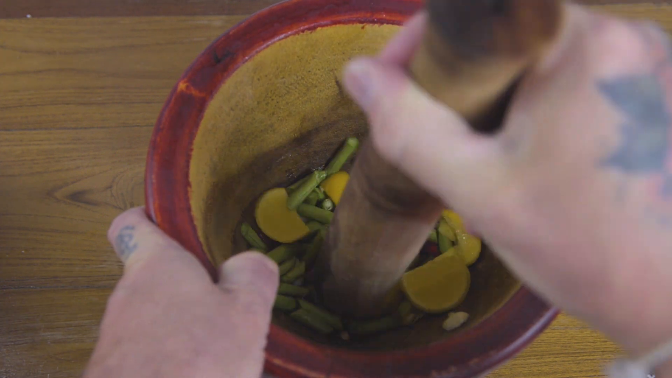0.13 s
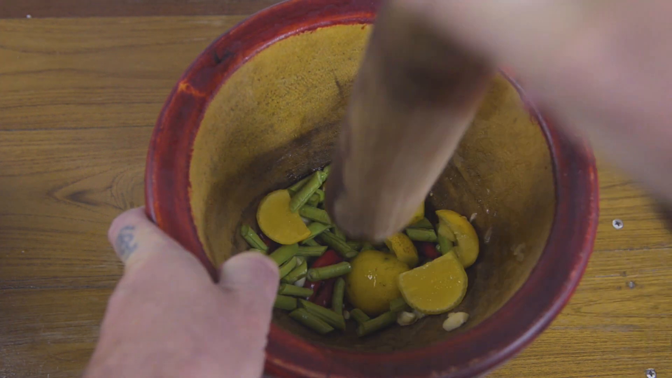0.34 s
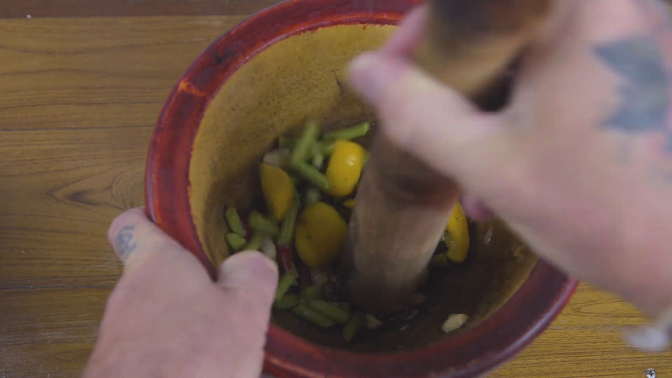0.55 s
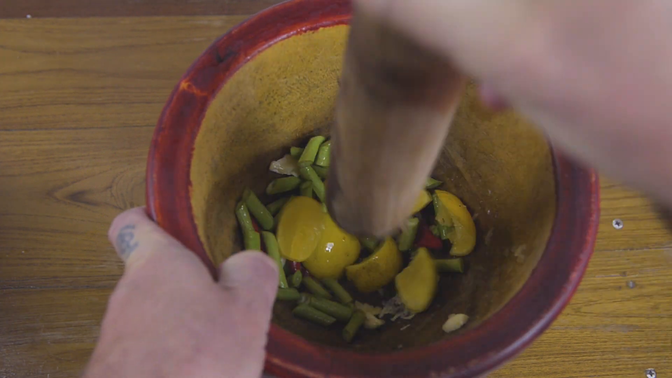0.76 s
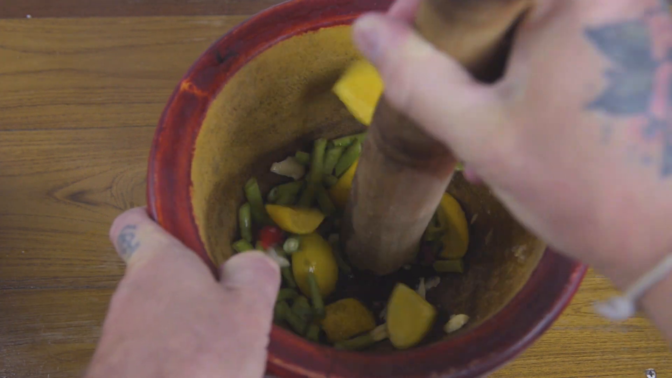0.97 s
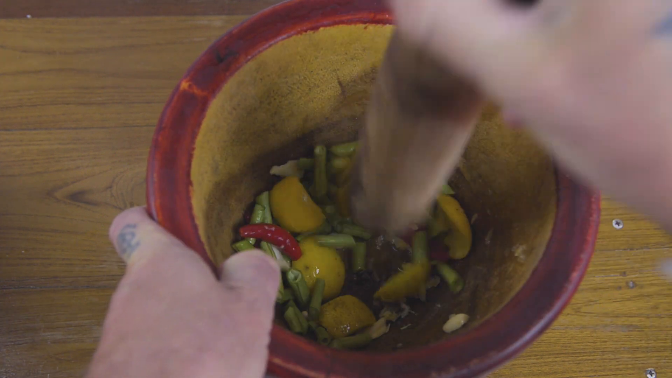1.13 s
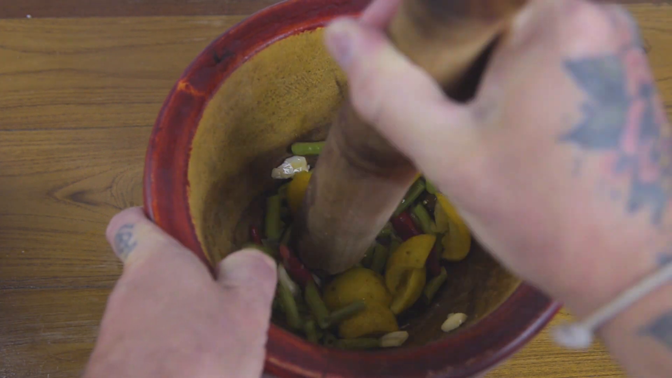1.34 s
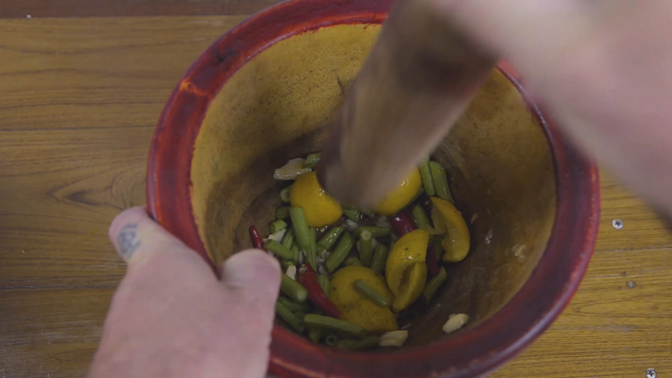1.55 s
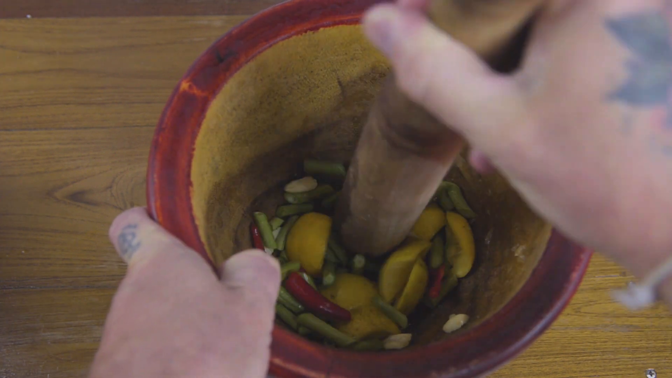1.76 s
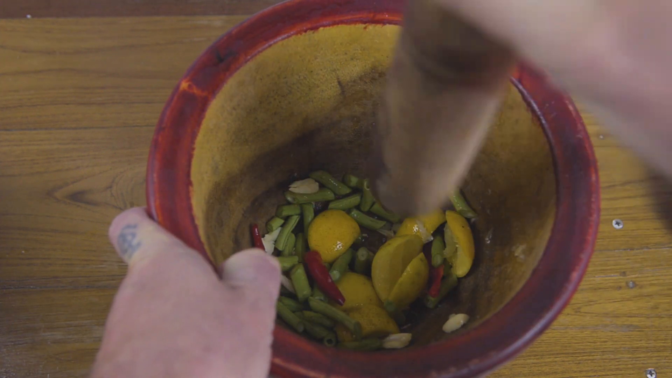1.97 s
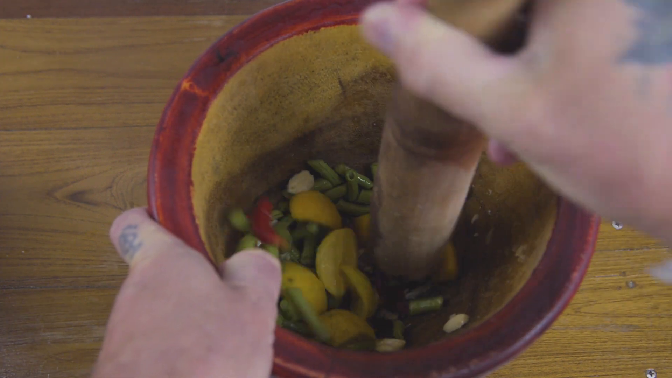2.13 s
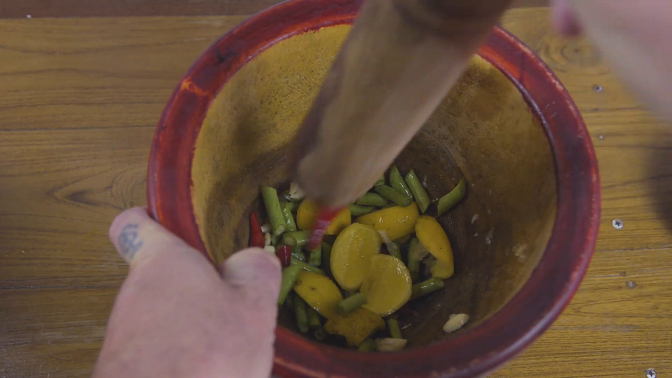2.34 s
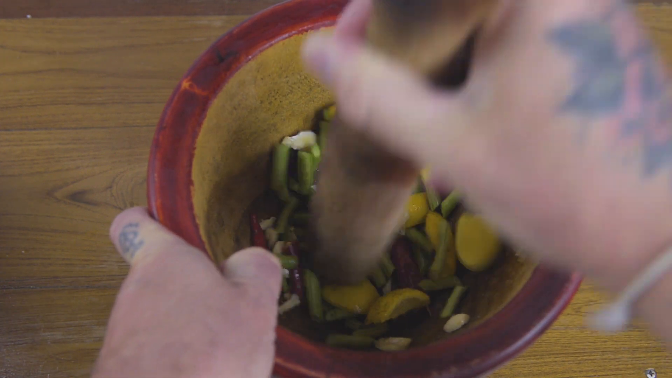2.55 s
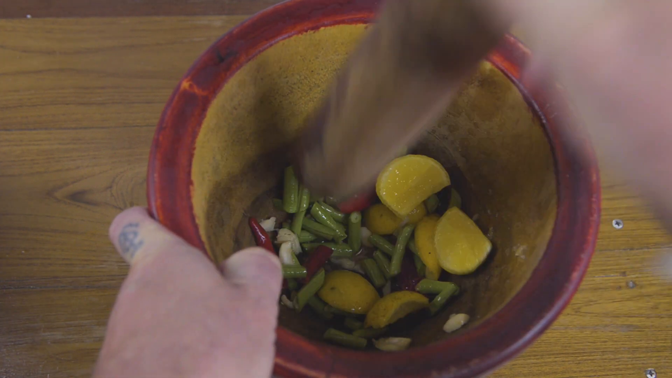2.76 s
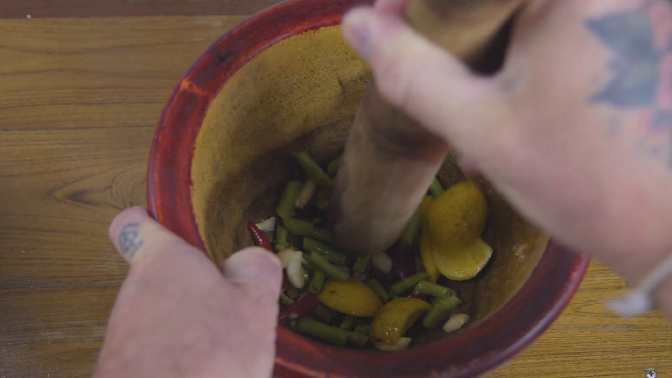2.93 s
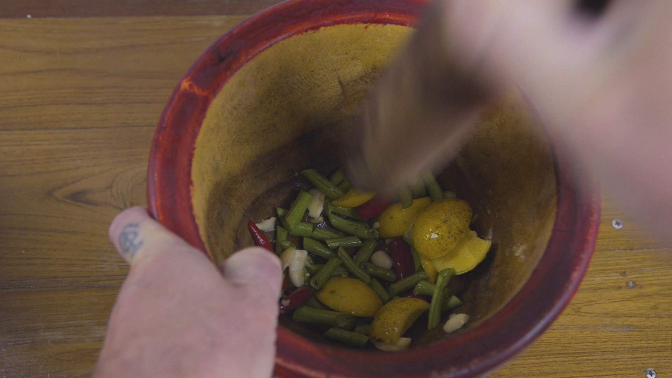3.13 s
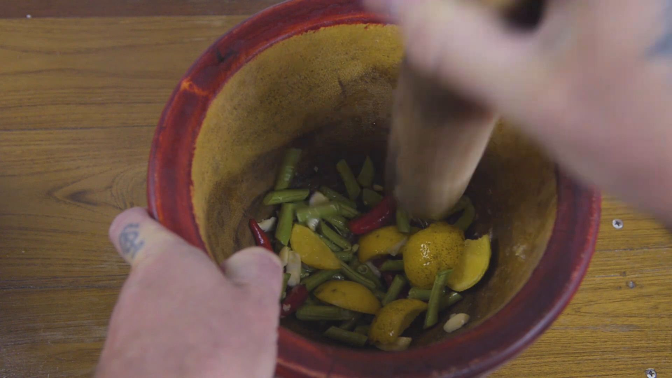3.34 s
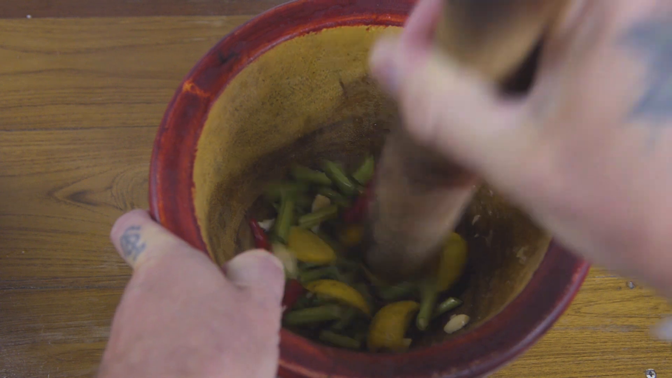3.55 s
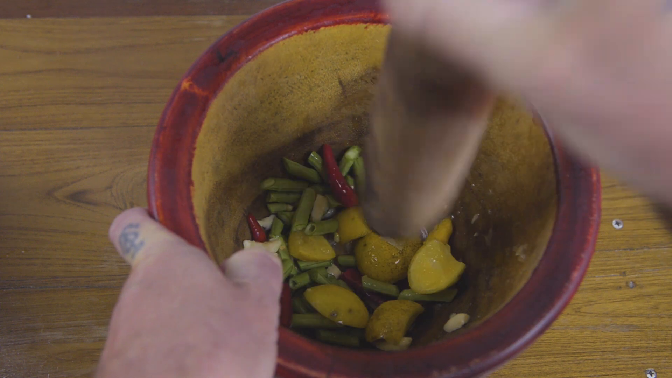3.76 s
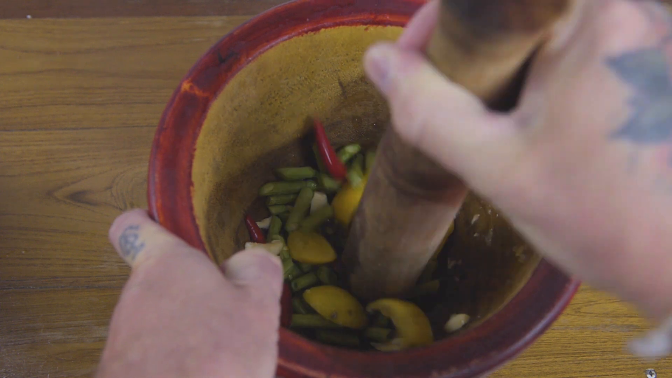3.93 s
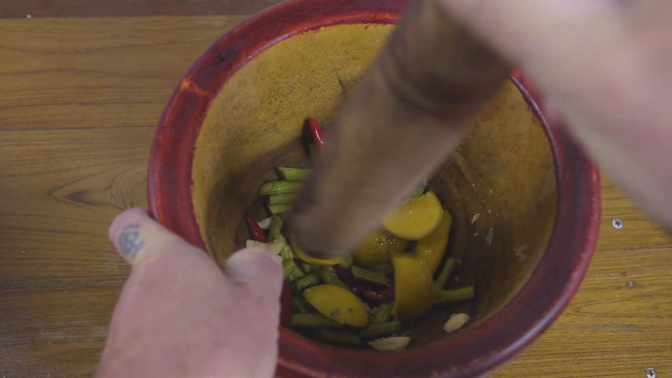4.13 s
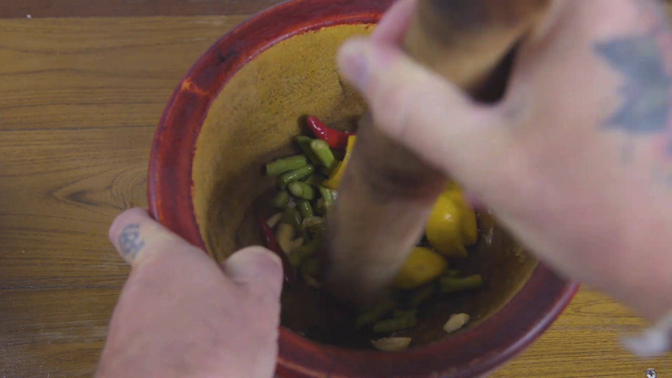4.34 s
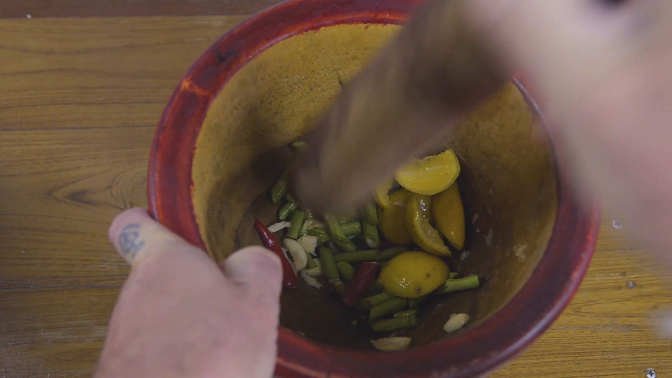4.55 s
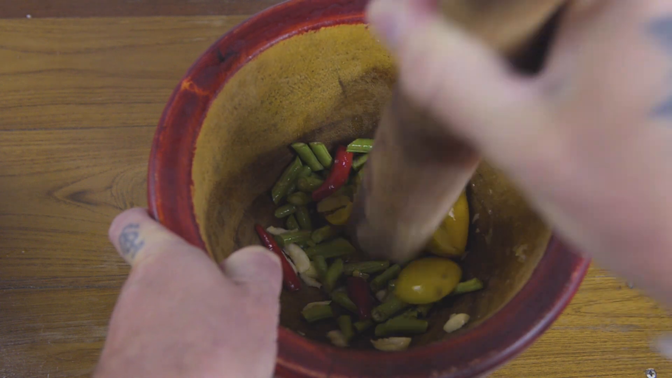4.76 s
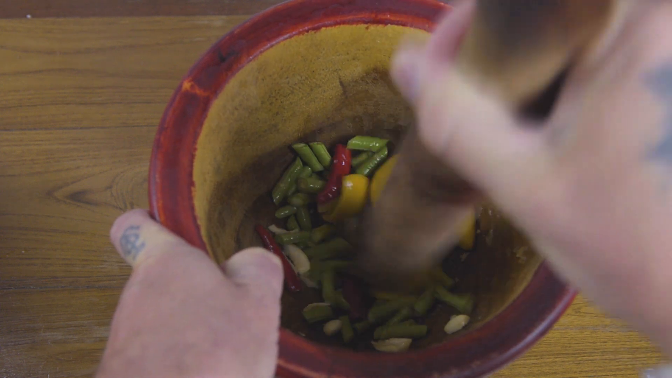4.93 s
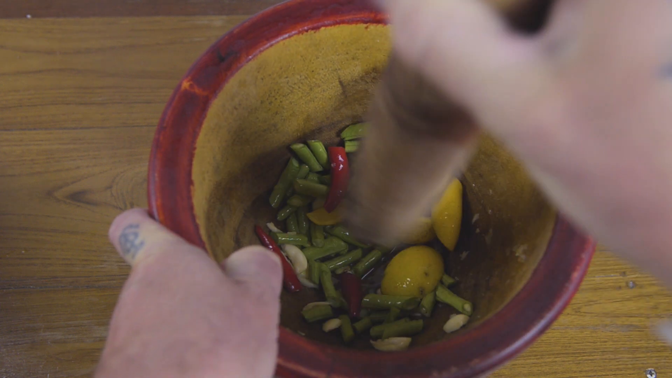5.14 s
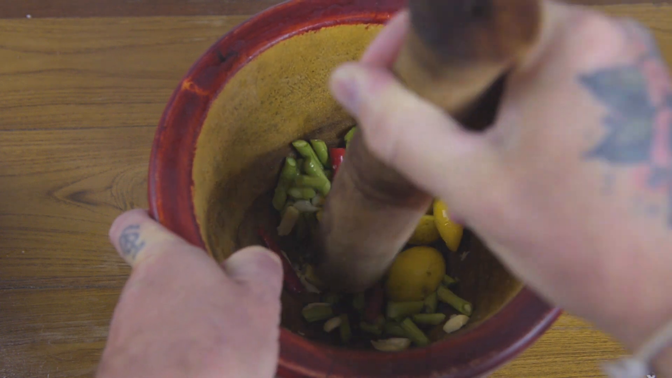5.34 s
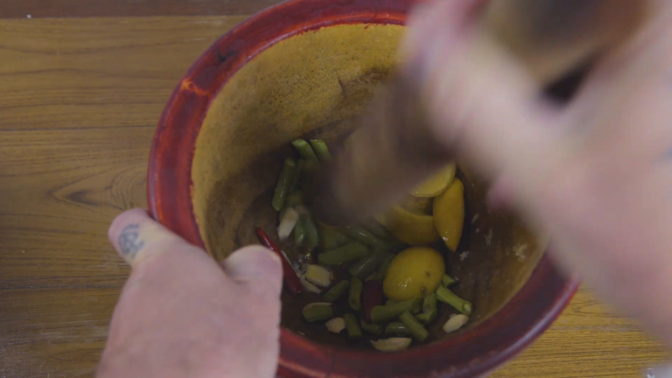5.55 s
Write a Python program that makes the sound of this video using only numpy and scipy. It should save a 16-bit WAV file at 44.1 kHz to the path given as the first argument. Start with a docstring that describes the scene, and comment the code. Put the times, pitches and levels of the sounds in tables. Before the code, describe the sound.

Close, even pounding of a wooden pestle in a mortar, each thud crunching and snapping beans and juicy fruit wedges.

```python
"""A wooden pestle pounds beans, chilli and fruit wedges in a mortar on a wooden table, heard close.
First, loose pieces stir over a quiet kitchen hum. From 0.12 s, 16 blows fall about 0.37 s apart.
Each crushes the vegetables (crackle, single snaps), then lands in knocks and thuds that ring mortar
and table. The mortar rocks back, the mash ticks, pieces tumble and the small kitchen reverberates.
The last blow comes at 5.6 s."""
import sys
import numpy as np
from scipy import signal
from scipy.fft import rfft, irfft
from scipy.io import wavfile
from scipy.ndimage import uniform_filter1d

SR = 44100
rng = np.random.default_rng(int(sys.argv[2]) if len(sys.argv) > 2 else 0)


def pcm_store(signal):
    """Save signal as 16-bit PCM."""
    levels = np.round(np.clip(np.atleast_2d(signal), -1, 1) * 32767)
    wavfile.write(sys.argv[1], SR, levels.astype(np.int16).T)


N = 250929

# Kitchen hum spectrum. Each row: frequency in Hz, relative level in dB.
HUM_SPECTRUM = [(20, -14), (35, -1), (60, 4), (111, 2.5), (200, -13), (330, -13), (540, -18.5), (1400, -19),
                (2400, -28), (4400, -30), (6400, -34.5), (9000, -35), (12000, -45), (15000, -58)]
# Loose pieces moving. Each row: start in seconds, length in seconds, level in dB, dullness in dB.
TUMBLES = [(0, 0.036, -49.5, 2.5), (0.184, 0.085, -40.5, 1.5), (0.915, 0.0081, -38, -2),
           (1.333, 0.018, -34.5, 4), (1.449, 0.03, -43, 3), (1.495, 0.095, -40.5, 4),
           (1.628, 0.033, -44.5, 1.5), (1.85, .03, -39, 11), (2.456, 0.03, -44, 1), (2.721, 0.056, -52, 15),
           (2.814, 0.13, -47.5, 3.5), (2.943, 0.051, -43.5, 17.5), (3.21, .012, -39, 6),
           (3.65, 0.054, -37.5, 3.5), (3.805, 0.0058, -44, 15), (4.052, 0.044, -32.5, 5),
           (4.155, 0.086, -46.5, 1), (4.588, 0.22, -43, 7.5), (4.965, 0.057, -29.5, -1.5),
           (5.049, 0.045, -34.5, 9), (5.61, .012, -34, -6)]
# Crackle spectrum in the bowl. Each row: frequency in Hz, relative level in dB.
CRACKLE_SPECTRUM = [(200, -30.5), (500, 5), (900, 2), (2400, 2), (3700, -1.5), (5500, -7), (8000, 0),
                    (14000, -16)]
# One crush per blow. Each row: start, rise and length in seconds, level and dullness in dB.
CRUSHES = [(.123, 0.0028, 0.042, -24, -3), (0.525, 0.0011, 0.056, -23, -0.5),
           (0.929, 0.015, 0.032, -16.5, 2), (1.345, 0.024, 0.029, -15.5, -3),
           (1.715, 0.0075, 0.042, -18, -4), (2.084, 0.024, 0.043, -14.5, 0), (2.48, 0.01, 0.044, -19, -3),
           (2.857, .004, 0.022, -15.5, 0), (3.216, 0.0086, 0.023, -16, -2.5),
           (3.578, 0.011, 0.041, -18.5, -4), (3.945, 0.016, 0.033, -16, -1),
           (4.286, 0.0074, 0.059, -20.5, 2), (4.647, 0.012, 0.02, -11, -3.5),
           (4.983, 0.0011, 0.042, -25.5, 1), (5.307, 0.0084, 0.03, -21.5, -4.5),
           (5.617, 0.0088, 0.03, -22, -3.5)]
# Pestle on bare wood. Each row: start in seconds, ring level in dB, pitch in Hz, clatter level in dB.
WOOD_KNOCKS = [(.125, -22.5, 554, -35.5), (.545, -10, 525, -20.5), (.966, -14.5, 530, -27.5),
               (1.36, -25.5, 380, -34), (1.73, -31, 496, -30), (1.86, -61, 940, -36.5),
               (2.11, -28, 504, -24.5), (2.5, -35, 525, -25.5), (2.88, -15, 257, -25),
               (3.242, -14, 243, -30.5), (3.625, -31, 254, -38.5), (3.975, -41, 482, -15),
               (4.298, -12.5, 285, -26), (4.68, -24, 447, -26), (5, -26, 463, -27),
               (5.322, -21.5, 165, -25.5), (5.625, -36, 560, -30.5)]
# Beans and skins snapping. Each row: start in seconds, level in dB, pitch in Hz, treble spray in dB.
BEAN_SNAPS = [(.1254, -21.5, 1470, -43), (.1393, -11.5, 3840, -38), (.1472, -11.5, 1820, -40),
              (.1684, -18.5, 1910, -47), (.5326, -20, 2020, -24.5), (.655, -34.5, 3250, -63),
              (.9332, -27, 2550, -16.5), (.9458, -11.5, 3010, -31), (.9706, -31, 1470, -42),
              (1.3701, -8.5, 2590, -50), (1.5044, -29.5, 1600, -60), (1.7331, -15, 2660, -17),
              (1.7383, -6.5, 2020, -40), (1.7533, -26, 2300, -19.5), (1.8636, -24, 1270, -62),
              (2.0972, -22, 2330, -28), (2.112, -10.5, 2070, -21), (2.5016, -6, 3100, -39),
              (2.5146, -4, 2850, -43), (2.6242, -33.5, 3250, -64), (2.8655, -23, 2880, -16),
              (2.8688, -4.5, 2980, -29), (2.951, -46, 1310, -54), (3.2265, -12, 2350, -20.5),
              (3.2383, -20, 2040, -35), (3.5969, -7.5, 3480, -20), (3.612, -11, 3030, -26),
              (3.9569, -8, 1890, -15.5), (4.071, -45, 3020, -36), (4.2935, -24, 2570, -18),
              (4.3213, -13.5, 2430, -37), (4.6618, -16, 2860, -21), (4.976, -24, 1780, -51),
              (4.9877, -13.5, 2540, -41), (5.0003, -22, 2250, -32), (5.3135, -26, 2800, -18),
              (5.3234, -22, 1730, -30), (5.355, -31, 2550, -33), (5.6293, -15, 2820, -43),
              (5.6414, -25, 2080, -39)]
# Pestle or mortar foot landing. Each row: start in seconds, level in dB, contact in milliseconds.
LANDINGS = [(.127, -21.5, 1.4), (.217, -21, 5.06), (.537, -5.5, 3.83), (.548, -15, 1.5), (.947, -9.5, 10.2),
            (.956, -6.5, 1.68), (.968, -2.5, 0.68), (1.366, -20, 3.8), (1.731, -19.5, 5.1),
            (2.101, -13, 5.2), (2.111, -19.5, 2), (2.153, -23.5, 1.7), (2.205, -18, 1.55),
            (2.493, -11, 6.4), (2.523, -17.5, 2.9), (2.577, -16.5, 1.64), (2.868, -8.5, 5.3),
            (2.88, -11, 2.23), (2.913, -14.5, 4.1), (3.223, -17.5, 9.3), (3.242, -16.5, 3.3),
            (3.607, -18.5, 9), (3.63, -34.5, 3.2), (3.96, -7.5, 5.3), (3.974, -20.5, 2.1),
            (3.981, -6.5, 1.54), (4.295, -8, 3.43), (4.304, -13, 5.3), (4.662, -16.5, 5.7),
            (4.699, -15, 8.2), (4.718, -17.5, 4.06), (4.758, -16, 3.5), (4.991, -16.5, 3.94),
            (5.043, -16, 4.2), (5.318, -9.5, 5.3), (5.326, -12, 3.64), (5.64, -20.5, 7.4)]
# Mortar and table modes. Each row: frequency in Hz, level in dB, T60 in seconds.
WOOD_MODES = [(115.1, -4.5, 0.14), (164.4, -8, 0.21), (238.8, -7.5, 0.35), (295, -16.5, 0.52),
              (372.4, -8, 0.21), (456.4, -5, 0.2), (507, -51.5, 0.063), (662, -23, 0.55), (848, -11, 0.13)]
# Table shudder and kitchen reverberation. Each row: band centre in Hz, T60 in seconds, gain in dB.
TAIL_BANDS = [(47.2, 0.34, 0.5), (109.2, 0.54, -0.5), (185.4, 0.53, -1.5), (264.6, 0.27, -1),
              (361, 0.43, -3.5), (466, 0.23, -4.5), (887, 0.35, -3), (1200, 0.51, -8.5), (2240, 0.12, -17),
              (4000, 0.4, -12), (6550, 0.33, -11.5), (11000, .25, -30)]
# Response of a microphone behind its ports. Each row: frequency in Hz, gain in dB.
MIC_RESPONSE = [(20, 20), (60, -5.5), (95, 3), (4200, -0.5), (4900, -3), (5400, -5.5), (5750, -16.5),
                (6200, -7.5), (6700, -11), (6900, -17), (7200, -10), (14000, -15.5), (15000, -35)]


def undb(db):
    """dB to gain."""
    return 10 ** (np.asarray(db) / 20)


def colour(x, points, size=4096):
    """Causal filter through (Hz, dB) points, by cepstral folding."""
    hz, db = np.transpose(points)
    grid_hz = np.arange(1, size // 2 + 2) * SR / size
    cepstrum = irfft(np.log(undb(np.interp(np.log(grid_hz), np.log(hz), db))))
    cepstrum[1:size // 2] *= 2
    cepstrum[size // 2 + 1:] = 0
    return signal.fftconvolve(x, irfft(np.exp(rfft(cepstrum))))[:len(x)]


def butter(order, hz, kind="band"):
    """Butterworth sections."""
    return signal.butter(order, hz, kind, fs=SR, output="sos")


def unit(x):
    """Scale to rms 1."""
    return x / np.sqrt(np.mean(x ** 2))


def add(out, start_s, x):
    """Mix x into out at start_s."""
    i = int(start_s * SR)
    out[i:i + len(x)] += x[:len(out) - i]


def hum(level_db):
    """Steady low murmur of appliances and air."""
    return undb(level_db) * unit(colour(rng.standard_normal(N), HUM_SPECTRUM))


def crackle(bursts, hits_per_s, spread_db, sag_db, drying_db, fall_s, low_hz, high_hz):
    """Dense tiny fractures of uneven size. Each burst swells and sags; its juicy treble fades first."""
    hits = (rng.random(N) < hits_per_s / SR) * rng.standard_normal(N)
    hits *= undb(spread_db * rng.exponential(1, N))
    grains = unit(colour(hits, CRACKLE_SPECTRUM))
    low = signal.sosfiltfilt(butter(2, low_hz, "low"), grains)
    high = signal.sosfiltfilt(butter(4, high_hz, "high"), grains)
    mid = grains - low - high
    out = np.zeros(N)
    for start_s, rise_s, length_s, db, dull_db, juice_db in bursts:
        i = int(start_s * SR)
        t = np.arange(min(int((length_s + 8 * fall_s) * SR), N - i)) / SR
        span = slice(i, i + len(t))
        attack = np.minimum(t / rise_s, 1) ** 2
        release = np.exp(-np.maximum(t - length_s, 0) / fall_s)
        body = undb(dull_db) * low[span] + undb(-dull_db) * mid[span]
        juice = undb(juice_db - drying_db * t / length_s) * high[span]
        out[span] += attack * undb(db - sag_db * t / length_s) * release * (body + juice)
    return out


def tumble(rise_s, juice_db):
    """Loose pieces slide and tumble in the bowl: a fine crackle."""
    bursts = [(start_s, rise_s, length_s, db, dull_db, juice_db - dull_db)
              for start_s, length_s, db, dull_db in TUMBLES]
    return crackle(bursts, hits_per_s=9000, spread_db=2.5, sag_db=4.5, drying_db=14,
                   fall_s=0.0096, low_hz=1610, high_hz=5600)


def crush(juice_db, loss_db_per_s):
    """Vegetables fracture under the pestle. A quicker crush squirts more juice: more treble."""
    bursts = [(start_s, rise_s, length_s, db, dull_db, juice_db - loss_db_per_s * length_s)
              for start_s, rise_s, length_s, db, dull_db in CRUSHES]
    return crackle(bursts, hits_per_s=4000, spread_db=3.0, sag_db=7.5, drying_db=14.5,
                   fall_s=0.0082, low_hz=1850, high_hz=5530)


def knocks(rise_s, band_ratio, ring_t60_cycles, clatter_hz, clatter_t60_s):
    """The pestle hits bare wood. Dense modes: narrow ringing noise under a wide clatter."""
    t = np.arange(SR // 4) / SR
    wide = butter(4, clatter_hz)
    out = np.zeros(N)
    for start_s, ring_db, hz, clatter_db in WOOD_KNOCKS:
        noise = rng.standard_normal(len(t))
        narrow = butter(1, [hz / band_ratio, hz * band_ratio])
        ring = undb(ring_db - 60 * t * hz / ring_t60_cycles) * unit(signal.sosfilt(narrow, noise))
        clatter = undb(clatter_db - 60 * t / clatter_t60_s) * unit(signal.sosfilt(wide, noise))
        add(out, start_s, np.minimum(t / rise_s, 1) * (ring + clatter))
    return out


def snaps(rows, fray, band_ratio, rise_cycles, fall_cycles, spray_hz):
    """A bean or skin breaks: a short, noise-frayed ring with a spray of treble."""
    t = np.arange(-200, 500) / SR  # envelope peaks at t = 0
    treble = butter(2, spray_hz)
    out = np.zeros(N)
    for peak_s, db, hz, spray_db in rows:
        noise = rng.standard_normal(len(t))
        narrow = butter(1, [hz / band_ratio, hz * band_ratio])
        cycles = hz * t
        envelope = np.exp(np.minimum(cycles / rise_cycles, -cycles / fall_cycles))
        ring = np.sin(2 * np.pi * cycles) + fray * unit(signal.sosfilt(narrow, noise))
        spray = unit(signal.sosfilt(treble, noise))
        add(out, peak_s + t[0], envelope * (undb(db) * ring + undb(spray_db) * spray))
    return out


def thuds(rows, ring_db, scatter_db, highpass_hz):
    """Each landing pushes the wood: heard directly and through modes weighted by a random strike spot."""
    push = np.zeros(N)
    drives = np.zeros((len(WOOD_MODES), N))
    for start_s, db, contact_ms in rows:
        phase = np.pi * np.arange(0, 1, 1 / (contact_ms * SR / 1000))
        pulse = -undb(db) * np.sin(phase) ** 2
        add(push, start_s, pulse)
        for drive in drives:
            add(drive, start_s, pulse * undb(scatter_db * rng.standard_normal()))
    out = signal.sosfilt(butter(2, highpass_hz, "high"), push)
    for drive, (hz, db, t60_s) in zip(drives, WOOD_MODES):
        step_rad = 2 * np.pi * hz / SR
        pole = np.exp(1j * step_rad - np.log(1000) / (t60_s * SR))
        out += undb(db + ring_db) * step_rad * signal.lfilter([1], [1, -pole], drive).real
    return out


def mortar_rocks(delay_s, jitter_s, level_db, contact_ms):
    """The mortar rocks back onto its foot once per blow. Returns rows for thuds()."""
    starts_s = [blow_s + delay_s + jitter_s * rng.standard_normal() for blow_s, *_ in CRUSHES]
    return [(start_s, level_db, contact_ms) for start_s in starts_s if start_s < N / SR]


def mash_ticks(per_blow, delay_s, level_db, spray_db, scatter_db, pitch_hz):
    """Faint wet ticks as the mash settles. Returns rows for snaps()."""
    rows = []
    for blow_s in np.repeat([row[0] for row in CRUSHES], per_blow):
        late, loud, sharp = rng.standard_normal(3)
        peak_s = blow_s + delay_s * np.exp(late / 2)
        offset_db = scatter_db * loud
        if peak_s < N / SR:
            rows.append((peak_s, level_db + offset_db, pitch_hz * np.exp(sharp / 3), spray_db + offset_db))
    return rows


def kitchen_tail(x, build_s, band_ratio, wood_db, steady_s):
    """Table and room store energy per band and leak it as diffuse noise favouring the wood modes."""
    noise = rng.standard_normal(N)
    for hz, _, t60_s in WOOD_MODES:
        q = np.pi * hz * t60_s / np.log(1000)
        noise = noise + undb(wood_db) * signal.lfilter(*signal.iirpeak(hz, q, fs=SR), noise)
    build_pole = np.exp(-1 / (build_s * SR))
    out = np.zeros(N)
    for hz, t60_s, db in TAIL_BANDS:
        band = butter(3, [hz / band_ratio, hz * band_ratio])
        leak_pole = undb(-120 / (t60_s * SR))
        energy = signal.lfilter([1 - leak_pole], [1, -leak_pole], signal.sosfilt(band, x) ** 2)
        energy = signal.lfilter([1 - build_pole], [1, -build_pole], energy)
        shudder = unit(signal.sosfilt(band, noise))
        # keep fast beats, flatten slow swells
        shudder /= np.sqrt(uniform_filter1d(shudder ** 2, int(steady_s * SR)) + 1e-3)
        out += undb(db) * np.sqrt(np.abs(energy)) * shudder
    return out


def scene():
    """Mono sum of wood, vegetables, their tail and the hum."""
    rocks = mortar_rocks(delay_s=0.07, jitter_s=0.02, level_db=-22, contact_ms=2.17)
    direct = thuds(LANDINGS + rocks, ring_db=-9.5, scatter_db=5.5, highpass_hz=77.4)
    direct += knocks(rise_s=0.0021, band_ratio=1.12, ring_t60_cycles=35.6,
                     clatter_hz=(364, 1760), clatter_t60_s=0.28)
    direct += crush(juice_db=11.5, loss_db_per_s=246)
    direct += tumble(rise_s=0.0066, juice_db=-6.5)
    ticks = mash_ticks(per_blow=5, delay_s=0.17, level_db=-53, spray_db=-54, scatter_db=4, pitch_hz=6500)
    direct += snaps(BEAN_SNAPS + ticks, fray=0.64, band_ratio=1.135,
                    rise_cycles=0.5313, fall_cycles=2.926, spray_hz=(6300, 11600))
    tail = kitchen_tail(direct, build_s=0.0042, band_ratio=1.372, wood_db=-3.0, steady_s=0.065)
    return (direct + tail + hum(level_db=-46))[None]


def record(dry):
    """Microphone colour, soft ceiling on the loudest thuds, steep low-pass."""
    ceiling, top_hz = 0.74, 15700
    heard = colour(dry[0], MIC_RESPONSE)
    rounded = heard / (1 + (heard / ceiling) ** 6) ** (1 / 6)
    lowpass = signal.ellip(10, 0.2, 80, top_hz, fs=SR, output="sos")
    return signal.sosfilt(lowpass, rounded)[None]


dry = scene()
out = record(dry)
pcm_store(out)
```